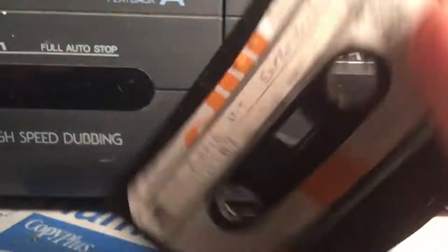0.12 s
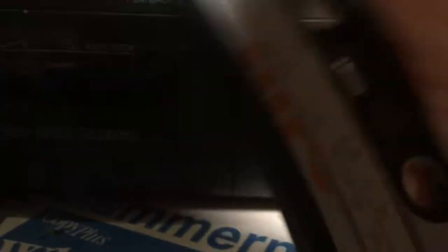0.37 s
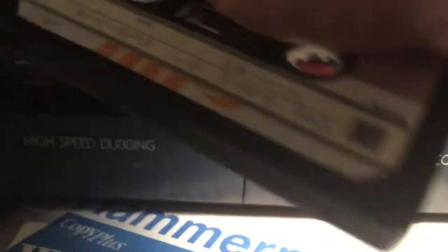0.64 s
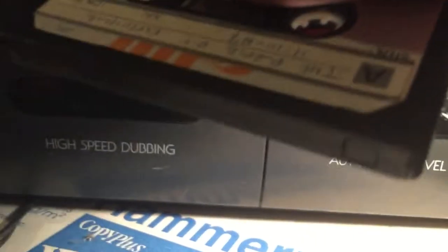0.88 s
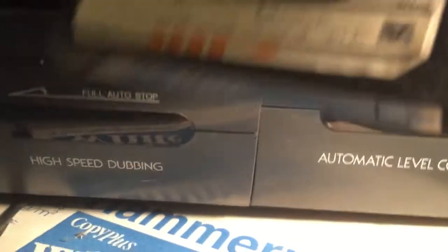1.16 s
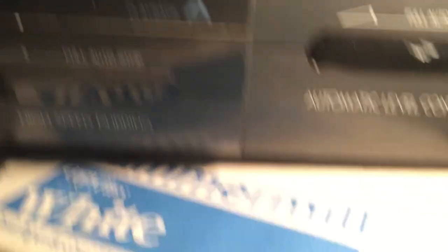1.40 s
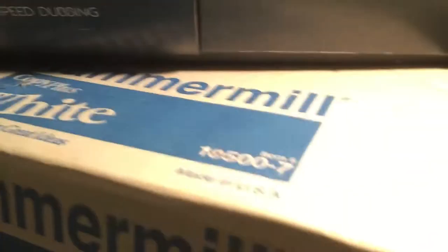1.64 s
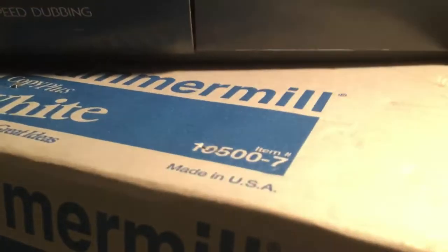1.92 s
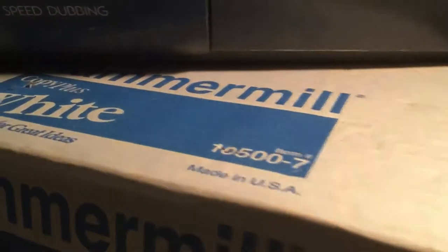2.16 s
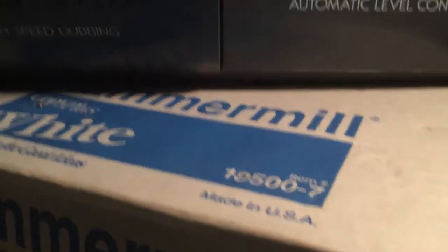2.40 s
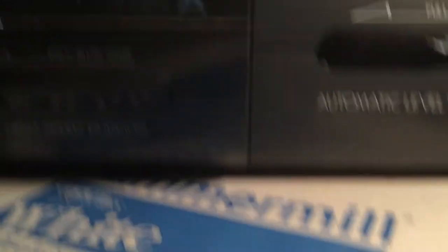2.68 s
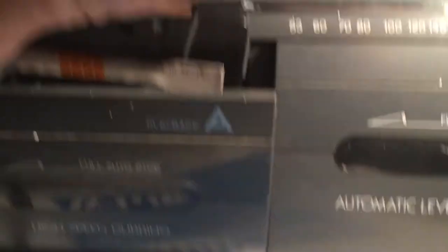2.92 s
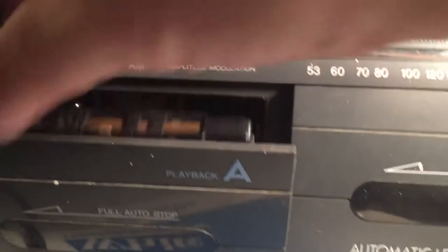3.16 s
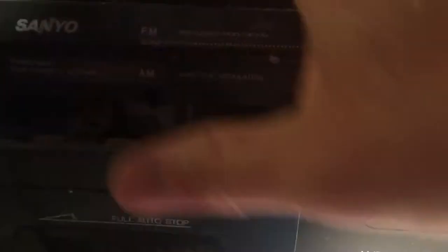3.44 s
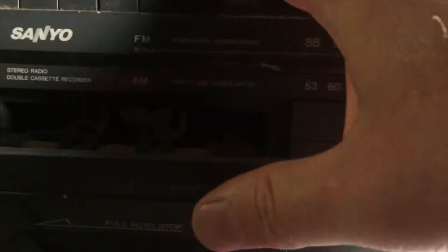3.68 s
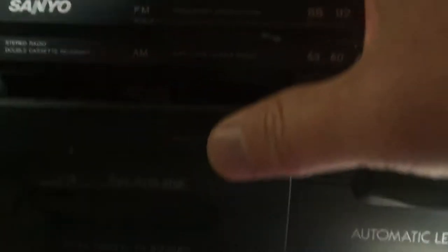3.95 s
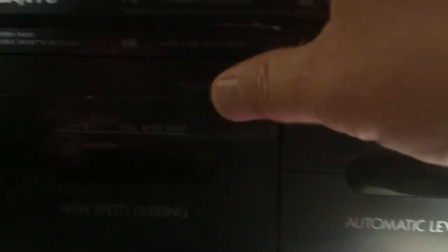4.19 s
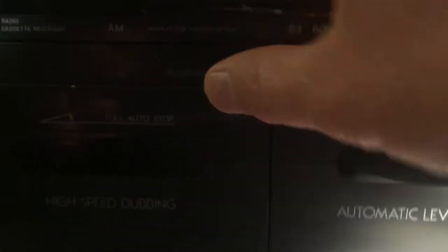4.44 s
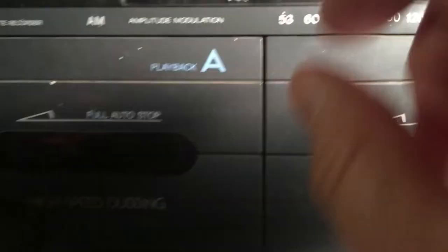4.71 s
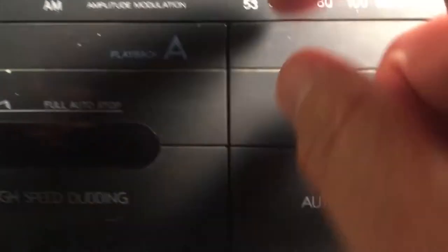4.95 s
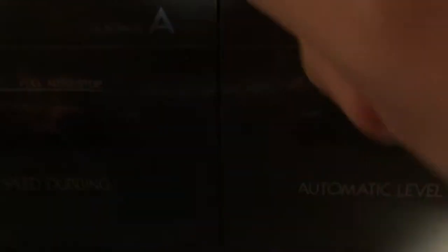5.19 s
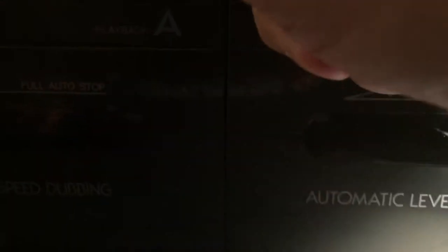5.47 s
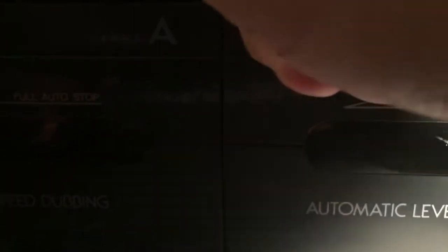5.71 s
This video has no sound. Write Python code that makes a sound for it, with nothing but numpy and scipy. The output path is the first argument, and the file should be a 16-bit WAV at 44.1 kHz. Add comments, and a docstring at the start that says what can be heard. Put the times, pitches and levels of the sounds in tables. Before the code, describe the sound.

A plastic cassette is turned in the fingers with light clicks, slid rattling into a tape deck, and its door snaps shut, close up in a small room.

```python
"""Fingers rub a plastic cassette over mains hum and microphone hiss, with low thumps; close to the microphone.
It is turned in the hand and slid into the door of a tape deck, which is pushed shut.
Each contact is a chattering noise burst that rings the hollow plastic; pings and thumps ring single or low modes.
Rubbing, finger squeaks and the slide down the guides are friction noise through resonances.
A small room answers the contacts with decaying noise tails."""
import sys
import numpy as np
from scipy import signal
from scipy.fft import rfft, irfft, next_fast_len
from scipy.io import wavfile
from scipy.ndimage import uniform_filter1d, map_coordinates

SR = 44100
rng = np.random.default_rng(int(sys.argv[2]) if len(sys.argv) > 2 else 0)


def master(y):
    """Save y as 16-bit WAV."""
    cut = np.clip(np.atleast_2d(y).T, -1, 1)
    pcm = np.round(cut * 32767)  # scale
    wavfile.write(sys.argv[1], SR, pcm.astype(np.int16))


def level_to_linear(level):
    """Convert decibel levels to linear amplitude factors, elementwise."""
    exponent = np.asarray(level, float) / 20
    return 10 ** exponent


N = 257544

# hum partials: pitch_hz, relative level_db
HUM_PARTIALS = [(59.2, -69.5), (118.4, -68), (177.6, -87.5), (242.2, -84.5), (360.7, -83)]
# hiss and rumble spectrum: freq_hz, relative density_db
HISS_SPECTRUM = [(15, -33), (25, -19.5), (45, -8.5), (120, -6.5), (166, -10.5), (365, -16), (453, -20.5),
                 (822, -21), (892, -20.5), (5940, -29), (13400, -34), (16200, -35.5)]
# fingers and edges slide over the shell: crest_s, rise_ms, fall_ms, level_db, brightness_db
FINGER_STROKES = [(.01, 25, 42, -53, 6), (.1, 70, 95, -56, 6), (.17, 24, 29, -51, 7),
                  (0.206, 3.6, 4.9, -57, 10.5), (.27, 70, 120, -60.5, 4), (.39, 86, 170, -55, 1.5),
                  (0.42, 12, 8, -45.5, -12.5), (.455, 30, 6.9, -46, -18), (0.499, 65, 100, -57, 4.5),
                  (.639, 30, 37, -70.5, 10), (0.689, 9.4, 40, -67, 4), (.8, 210, 150, -73, -2),
                  (1.1, 18, 35, -42.5, 1.5), (1.17, 63, 60, -66, -1), (1.25, 55, 210, -60.5, -2),
                  (1.33, 48, 99, -62, -1), (1.262, 20, 27, -49, -10), (1.398, 16, 54, -52.5, -0.5),
                  (1.49, 84, 104, -58, 4), (1.6, 110, 170, -69, -3.5), (1.8, 120, 200, -75.5, -3.5),
                  (2.33, 50, 34, -61.5, -8), (2.397, 38, 27, -42, -17.5), (2.6, 26, 18, -48, -4.5),
                  (2.675, 38, 20, -54, -3), (2.769, 14, 6, -46, -16), (2.8, 21, 56, -38, -10),
                  (2.86, 49, 83, -57, -12), (2.99, 73, 210, -51, 2), (3.025, 12, 18, -45, -6),
                  (3.13, 38, 65, -45.5, 0.5), (3.19, 48, 98, -34, -8.5), (3.27, 30, 110, -50, -0.5),
                  (3.6, 13, 29, -57, -6), (3.651, 60, 91, -64.5, -23.5), (3.95, 66, 88, -62.5, 8),
                  (4.13, 82, 150, -73.5, -4.5), (4.241, 14.8, 8.6, -32.5, -8), (4.31, 24, 117, -56.5, -5.5),
                  (4.4, 150, 135, -71, -3), (4.53, 15, 19, -49, -5), (5.55, 153, 150, -77, -3),
                  (5.84, 120, 30, -73, -19)]
# the grip shifts and rumbles through the hand: crest_s, rise_ms, fall_ms, level_db
GRIP_SHIFTS = [(.06, 330, 67, -38), (.17, 70, 33, -38.5), (0.203, 6.5, 5.3, -24.5), (1.101, 22, 50, -37),
               (1.15, 27, 92, -53), (1.262, 22, 11, -55), (1.41, 35, 86, -45), (2.31, 44, 115, -49.5),
               (2.44, 62, 102, -51.5), (2.601, 25, 29, -54), (2.8, 24, 18, -41.5), (2.96, 320, 160, -56.5),
               (3.13, 19, 28, -48), (3.2, 68, 120, -45), (3.4, 37, 66, -58), (3.599, 13, 29, -57),
               (3.65, 70, 120, -67.5), (4.24, 12, 9, -33.5), (4.43, 90, 160, -62), (4.53, 15.5, 14, -52),
               (5.75, 120, 160, -73.5)]
# shell damped by the fingers: mode_hz, width_hz before widen, level_db
DAMPED_SHELL_MODES = [(295, 140, -4.5), (603, 83, 2), (1100, 700, -2.5), (1700, 400, -2), (2600, 380, 2.5),
                      (3160, 3600, -1.5), (4330, 990, -0.5), (5300, 500, -7.5), (6700, 950, -6),
                      (8300, 830, -10.5), (9550, 450, -7), (12400, 600, -11)]
# cabinet, boom first: mode_hz, width_hz before widen, level_db
CABINET_MODES = [(83, 41, 0), (206.5, 140, -3), (287, 150, -4.5)]
# heavy contacts that shake the cabinet: start_s, relative level_db, boom_db relative to level_db
CABINET_THUMPS = [(0.011, -32, -20), (0.064, -24.5, -17), (0.106, -34, -6), (0.18, -27, -7),
                  (0.193, -20.5, -18), (0.413, -58, 9.5), (0.946, -54, -14.5), (1.08, -40, -10.5),
                  (1.105, -39, 5.5), (1.271, -34, -22), (1.402, -30.5, -15), (2.285, -39, -25),
                  (2.407, -33.5, -17.5), (2.77, -45, -8.5), (2.819, -26.5, -8.5), (2.842, -42, -4.5),
                  (3.025, -42, -4), (3.141, -37, -14), (3.169, -31.5, -23.5), (3.217, -22.5, -7),
                  (3.24, -20, -11), (3.299, -26, -8.5), (3.335, -35.5, -6.5), (3.381, -45, -4),
                  (3.582, -63, -14.5), (4.05, -55.5, -10), (4.237, -32.5, -20), (4.266, -26.5, -6.5),
                  (4.279, -23, -4.5), (4.49, -41, -23), (4.518, -42, -22)]
# colour of the echo: freq_hz, level_db
WALL_COLOUR = [(150, 5), (1000, -0.5), (3000, -1), (12000, -4.5)]
# echo decay: freq_hz, t60_s
ROOM_DECAY = [(150, 0.14), (1000, 0.19), (4000, 0.18), (12000, 0.1)]
# contacts: start_s, shell_db (loudest 3 ms), weight_db, hardness_db, chatter_t60_s before limits and haste
SHELL_CONTACTS = [(.1829, -41, 7, -0.5, 0.022), (.1951, -39, 6, 2, 0.098), (.393, -48, -5, 14.5, 0.026),
                  (.4252, -41, -12, 7, 0.019), (0.4361, -25.5, -12.5, -11, 0.019),
                  (.4601, -43, -18, -22, 0.016), (.9448, -56, 11, -7.5, 0.064),
                  (1.0596, -42.5, -2.5, -9, .04), (1.0828, -21, -3.5, 1.5, 0.033),
                  (1.1046, -15.5, -3.5, -3, 0.062), (1.2502, -37, -1, 3, 0.044),
                  (1.2698, -12.5, -6.5, -5.5, .055), (1.4017, -23.5, 1.5, -1, 0.043),
                  (2.2768, -34, 4.5, -2, 0.071), (2.4045, -26, 4.5, -8, 0.059),
                  (2.4548, -43, -18, -13, .034), (2.507, -52, 6, -4.5, 0.091),
                  (2.7022, -52, -9, -11, 0.042), (2.773, -19, -9.5, -5, 0.032),
                  (2.8081, -27, -25, -2, .036), (2.8191, -24, -18, 12.5, 0.06),
                  (2.823, -12, -8.5, -9, 0.066), (2.839, -27.5, 1.5, -8.5, .052),
                  (2.8553, -34, -2, -9, 0.04), (2.9471, -43.5, -29, 10, .11), (3.023, -38, -15, 4.5, 0.059),
                  (3.1413, -42, 9, -2.5, 0.028), (3.1582, -42, -9, 12.5, 0.042),
                  (3.1666, -17.5, 0, 5, 0.14), (3.1767, -13.5, -7, -4, 0.02), (3.1878, -28.5, 3, 5, 0.14),
                  (3.2001, -20.5, -30, 2, .1), (3.2214, -3, -9, -0.5, 0.028), (3.2328, -17, -2, -3, .04),
                  (3.2444, -26, -6, -13, 0.077), (3.2609, -34.5, -1.5, 9.5, 0.046),
                  (3.2675, -20, -14, -11, 0.073), (3.2975, -16.5, -10, 4, 0.061),
                  (3.3053, -18, -7, 0, 0.079), (3.3345, -18.5, -11, -4, 0.043),
                  (3.3599, -27.5, -11.5, -7.5, .1), (3.3819, -46, -18, 13, 0.035),
                  (3.395, -41.5, -11.5, -3, 0.087), (3.5765, -36, -3.5, 1, 0.088),
                  (3.5866, -31.5, -8, -22, 0.048), (3.6785, -46, 1.5, -12.5, 0.056),
                  (3.767, -45, 0.5, -13, 0.092), (3.7918, -73, -1, 15, 0.055),
                  (4.0497, -42, -6.5, -9.5, 0.049), (4.2021, -43.5, -11, -1.5, .04),
                  (4.2269, -45.5, -5, -0.5, .06), (4.238, -31, -13, -2.5, 0.058),
                  (4.246, -28.5, 6, 12, 0.056), (4.2529, -15.5, -3.5, -4, 0.02),
                  (4.2653, -11.5, 2, 3, .083), (4.2733, -11, -6.5, 5.5, 0.04),
                  (4.2789, -6.5, -12, -2.5, 0.024), (4.4935, -44, 6, 0, 0.13),
                  (4.5161, -26.5, -2.5, -5.5, 0.038), (4.6365, -47, -6, 3.5, 0.011),
                  (5.6657, -47.5, -5, -8, 0.078), (5.817, -38, -4.5, 0, 0.14)]
# hollow shell and door: mode_hz, width_hz before widen, level_db
PLASTIC_MODES = [(558, 42, -8), (649, 98, -1.5), (834, 310, 1.5), (975.3, 180, 4), (1237, 92, -0.5),
                 (1596, 130, -6), (1650, 400, -23.5), (2177, 56, -6), (2500, 490, -3.5), (2980, 340, 4),
                 (3564, 520, 4.5), (3685, 520, 2.5), (4380, 470, -4), (5020, 170, -13.5), (6130, 1400, 3.5),
                 (6610, 1100, 3.5), (6860, 260, -3), (9180, 700, -10), (9380, 1100, -14.5),
                 (11800, 4500, -18.5), (14100, 1800, -34.5)]
# edges of the knock, shell, click and crack bands: edge_hz
REGISTER_EDGES = (380, 900, 1900, 5200, 17000)
# a corner strikes and one mode pings: start_s, level_db (loudest 3 ms), mode_hz, width_hz, burst_t60_s
CORNER_PINGS = [(.3925, -31.5, 7100, 2500, .015), (0.4258, -30, 13300, 2500, .012),
                (.436, -33.5, 6500, 900, .02), (1.0833, -26, 5900, 1210, .02),
                (1.061, -40.5, 1200, 150, 0.043), (1.104, -27, 2900, 700, .04),
                (1.2697, -25, 6300, 1110, .025), (1.4014, -36, 4250, 497, .04),
                (2.772, -27, 3000, 1506, .03), (3.2205, -6.5, 5800, 1302, .02),
                (3.2988, -19, 3900, 800, .04), (4.05, -43, 1118, 507, 0.038),
                (4.2024, -37, 3700, 905, .035), (4.265, -10.5, 4190, 1690, 0.029),
                (4.52, -52, 2500, 402, .04), (4.6365, -38.5, 2300, 1998, .012),
                (5.667, -48, 1160, 503, 0.065), (5.817, -42.5, 953, 495, 0.14)]
# a damp fingertip squeaks on one mode: crest_s, rise_ms, fall_ms, level_db, mode_hz
FINGERTIP_SQUEAKS = [(1.52, 98, 190, -62.5, 2750), (1.72, 25, 25, -65.5, 6700), (2.35, 50, 45, -68, 3600),
                     (2.36, 29, 45, -61, 4570), (2.35, 35, 25, -54, 620), (2.595, 20, 25, -57, 4000),
                     (2.59, 18, 18, -63, 8600), (2.65, 61, 71, -63.5, 1390), (2.67, 22, 20, -66, 5370),
                     (3.15, 25, 15, -43, 3950), (3.2, 18, 13, -31, 3697), (3.83, 49, 72, -72, 3754),
                     (4.12, 70, 84, -71, 3758), (5.521, 50, 80, -76.5, 4000)]
# level of the shell squeaking down the guides: time_s, level_db
SLIDE_LEVEL = [(2.88, -74.5), (2.94, -48.5), (2.98, -47), (3.021, -35), (3.06, -47.5), (3.1, -49),
               (3.14, -40.5), (3.168, -39.5), (3.194, -25.5), (3.219, -30.5), (3.241, -60)]
# guides of the door: mode_hz, width_hz, level_db
GUIDE_MODES = [(1370, 260, -4), (1680, 200, -7), (2700, 260, -9), (3290, 170, -1), (3700, 170, 0),
               (4100, 200, -4), (4650, 240, -6), (6300, 300, -14)]
# microphone response: freq_hz, gain_db
MIC_RESPONSE = [(30, 1.5), (60, -0.5), (4800, 0.5), (6000, -0.5), (7800, 1), (11000, -0.5), (14000, -0.5),
                (15800, 1.5), (16600, -22.5)]


def unit(x):
    """Scaled to rms 1."""
    return x / np.sqrt(np.mean(x ** 2) + 1e-20)


def along(points, hz):
    """Interpolates (freq_hz, value) points on a log frequency axis."""
    freq_hz, value = np.transpose(points)
    return np.interp(np.log(hz + 1), np.log(freq_hz + 1), value)


def filtered(x, response):
    """x times a complex response of frequency."""
    n = x.shape[-1]
    padded = next_fast_len(n + 8192)
    spectrum = rfft(x, padded) * response(np.fft.rfftfreq(padded, 1 / SR))
    return irfft(spectrum, padded)[..., :n]


def band(f, lo_hz, hi_hz):
    """Causal band-pass response."""
    sos = signal.butter(2, [lo_hz, hi_hz], "bandpass", fs=SR, output="sos")
    return signal.sosfreqz(sos, f, fs=SR)[1]


def modes(table, f, widen):
    """Response of each resonance, one row per mode, signs alternating."""
    mode_hz, width_hz, level_db = np.transpose(table)[:, :, None]
    damping = 1j * f * width_hz * widen
    sign = (-1) ** np.arange(len(table))[:, None]
    return sign * level_to_linear(level_db) * damping / (mode_hz ** 2 - f * f + damping)


def wobble(knots_per_s):
    """A smooth random curve through random knots."""
    knots = rng.standard_normal(int(N * knots_per_s / SR) + 4)
    return map_coordinates(knots, [np.arange(N) * knots_per_s / SR])


def swell(crest_s, rise_ms, fall_ms):
    """A bell-shaped gain that rises to 1 and falls again."""
    ms = (np.arange(N) / SR - crest_s) * 1000
    return np.exp(-2 * (ms / np.where(ms < 0, rise_ms, fall_ms)) ** 2)


def patchy(depth_db):
    """Noise whose strength drifts in streaks about 500 Hz wide and 50 ms long."""
    z = signal.stft(rng.standard_normal(N), nperseg=256)[2]
    field = uniform_filter1d(rng.standard_normal(z.shape), size=3, axis=0)
    field = uniform_filter1d(field, size=16, axis=1)
    return signal.istft(z * level_to_linear(depth_db * unit(field)), nperseg=256)[1][:N]


def add(out, start_s, part, level_db):
    """Lays a sound at start_s with the rms of its loudest 3 ms at level_db."""
    loudest = np.sqrt(uniform_filter1d(part ** 2, size=132).max())
    out[round(start_s * SR):][:len(part)] += level_to_linear(level_db) * part / loudest


def floor():
    """Mains hum, wavering in level and phase, over steady hiss and rumble."""
    t = np.arange(N) / SR
    hum = np.zeros(N)
    for pitch_hz, level_db in HUM_PARTIALS:
        gain = level_to_linear(level_db + 2 + 1.3 * wobble(5.6))
        hum += gain * np.sin(2 * np.pi * pitch_hz * t + 0.3 * wobble(15.0))
    hiss = filtered(rng.standard_normal(N), lambda f: level_to_linear(along(HISS_SPECTRUM, f)))
    return hum + level_to_linear(-68.5) * unit(hiss)


def rubbing():
    """Friction hiss, partly through the damped plastic, follows the strokes; the grip adds low rumble."""
    gains = np.zeros((3, N))  # low body, middle, treble
    for crest_s, rise_ms, fall_ms, level_db, bright_db in FINGER_STROKES:
        shares_db = np.array([[-24], [0], [bright_db]])
        gains += level_to_linear(level_db + shares_db) * swell(crest_s, rise_ms, fall_ms)
    for crest_s, rise_ms, fall_ms, level_db in GRIP_SHIFTS:
        gains[0] += level_to_linear(level_db) * swell(crest_s, rise_ms, fall_ms)

    def colour(f):
        shell = 0.12 + np.abs(modes(DAMPED_SHELL_MODES, f, widen=0.87).sum(0))
        box = level_to_linear(4) * np.abs(modes(CABINET_MODES, f, widen=0.4)[1])
        return shell + box

    edges_hz = (120, 900, 5000, 17000)
    out = np.zeros(N)
    for gain, lo_hz, hi_hz in zip(gains, edges_hz, edges_hz[1:]):
        grain = patchy(depth_db=3) * level_to_linear(1.5 * wobble(120))
        out += gain * unit(filtered(grain, lambda f: colour(f) * band(f, lo_hz, hi_hz)))
    return out


def thumps():
    """A soft push of a few milliseconds rings the low modes of the cabinet."""
    t = np.arange(16384) / SR
    f = np.fft.rfftfreq(len(t), 1 / SR)
    box = modes(CABINET_MODES, f, widen=0.71) / (1 + 1j * f / 450) ** 2
    out = np.zeros(N + len(t))
    for start_s, level_db, boom_db in CABINET_THUMPS:
        push = rng.standard_normal(len(t)) * np.exp(-t / 0.012)
        rings = irfft(rfft(push) * box)
        add(out, start_s, rings[0], level_db + boom_db - 1.0)
        add(out, start_s, rings[1:].sum(0), level_db - 4.5)
    return out[:N]


def room(x):
    """Each frequency dies at its own speed; every third of a second meets a new tail."""
    out = np.zeros(N + SR)
    step, delay = SR // 3, 200  # samples
    for a in range(0, N, step):
        hz, t, z = signal.stft(rng.standard_normal(SR // 2), SR, nperseg=256)
        t60_s = np.maximum(along(ROOM_DECAY, hz), 0.02)[:, None]
        fall_db = along(WALL_COLOUR, hz)[:, None] - 60 * t / t60_s
        tail = signal.istft(z * level_to_linear(fall_db), SR, nperseg=256)[1]
        wet = signal.fftconvolve(x[a:a + step], tail / np.linalg.norm(tail))
        out[a + delay:][:len(wet)] += wet
    return out[:N]


def contacts():
    """Strike and chatter ring the modes at new strengths; weight feeds the knock, hardness the click and crack."""
    t = np.arange(8192) / SR
    f = np.fft.rfftfreq(len(t), 1 / SR)
    body = modes(PLASTIC_MODES, f, widen=0.97)
    bands = np.array([band(f, lo, hi) for lo, hi in zip(REGISTER_EDGES, REGISTER_EDGES[1:])])
    haste = np.array([[1.0], [1.0], [1.3], [1.7]])  # the treble of the chatter dies sooner
    modes_hz = np.transpose(PLASTIC_MODES)[0]
    even = 0.16 / (1 + 1j * f / 7000)  # modes too dense to list
    strike = 0.33 * np.exp(-t / 0.0014)
    out = np.zeros(N + len(t))
    for start_s, shell_db, weight_db, hard_db, t60_s in SHELL_CONTACTS:
        decay = level_to_linear(-60 * haste * t / np.clip(t60_s, 0.004, 0.12))
        chatter = decay * (1 - np.exp(-t / 0.00054))
        impacts = rng.standard_normal(len(t)) * (chatter + strike)
        # the struck spot favours modes near one pitch, higher for harder contacts
        spot_hz = 3430 * 2 ** (0.07 * hard_db + 0.28 * rng.standard_normal())
        favour_db = 7 * np.exp(-(np.log(modes_hz / spot_hz) / 0.11) ** 2)
        scatter_db = rng.normal(0, 2, len(body))
        ring = level_to_linear(favour_db + scatter_db) @ body + even
        parts = irfft(rfft(impacts) * ring * bands)
        crack_db = -3.5 + 1.1 * hard_db
        for part, share_db in zip(parts, (weight_db, 0, hard_db, crack_db)):
            add(out, start_s, part, shell_db + share_db)
    return out[:N]


def pings():
    """A short noise burst rings one resonance, applied twice."""
    t = np.arange(4096) / SR
    out = np.zeros(N + len(t))
    for start_s, level_db, mode_hz, width_hz, t60_s in CORNER_PINGS:
        burst = rng.standard_normal(len(t)) * level_to_linear(-60 * t / t60_s)
        ping = filtered(burst, lambda f: modes([(mode_hz, width_hz, 0)], f, widen=1)[0] ** 2)
        add(out, start_s, ping, level_db)
    return out[:N]


def squeaks():
    """Friction noise sings in one narrow resonance for a moment."""
    out = np.zeros(N)
    for crest_s, rise_ms, fall_ms, level_db, mode_hz in FINGERTIP_SQUEAKS:
        mode = [(mode_hz, mode_hz / 14, 0)]
        sing = filtered(rng.standard_normal(N), lambda f: modes(mode, f, widen=0.97)[0] ** 2)
        out += level_to_linear(level_db) * swell(crest_s, rise_ms, fall_ms) * unit(sing)
    return out


def slide():
    """Uneven slips sing in the narrow resonances of the guides."""
    time_s, level_db = np.transpose(SLIDE_LEVEL)
    slips = patchy(depth_db=3.5) * level_to_linear(1.4 * wobble(150))
    squeak = unit(filtered(slips, lambda f: modes(GUIDE_MODES, f, widen=1).sum(0)))
    return level_to_linear(np.interp(np.arange(N) / SR, time_s, level_db, left=-120, right=-120)) * squeak


def scene():
    """Contacts, thumps and pings with their echo; friction and floor stay dry."""
    hits = thumps() + contacts() + pings()
    friction = rubbing() + squeaks() + slide()
    return (hits + level_to_linear(-21.5) * room(hits) + friction + floor())[None]


def roll_off(x):
    """The treble ends steeply here."""
    return signal.sosfilt(signal.butter(12, 16320, fs=SR, output="sos"), x)


def record(dry):
    """Microphone: nearly flat, steep loss above 15.8 kHz; clips at full scale."""
    heard = filtered(dry, lambda f: level_to_linear(along(MIC_RESPONSE, f)))
    return roll_off(np.clip(heard, -1, 1))


dry = scene()
out = record(dry)
master(out)
```